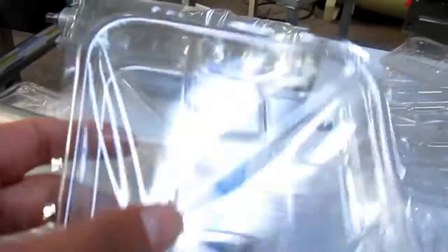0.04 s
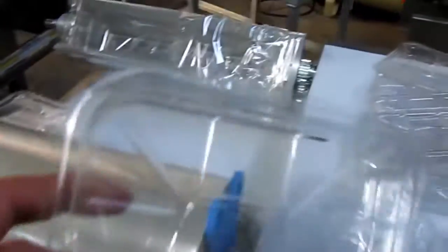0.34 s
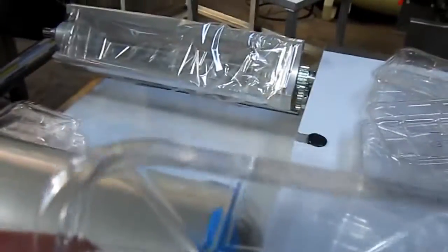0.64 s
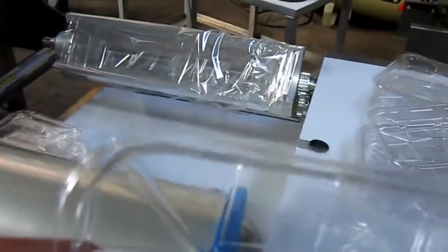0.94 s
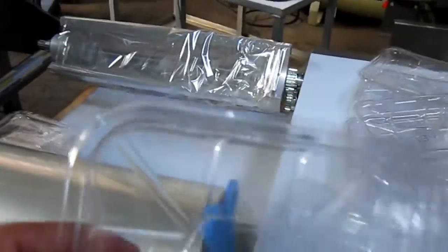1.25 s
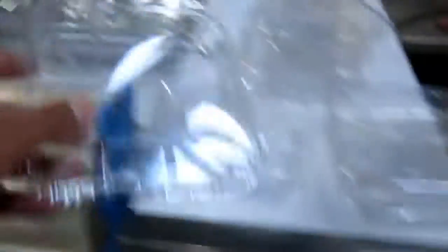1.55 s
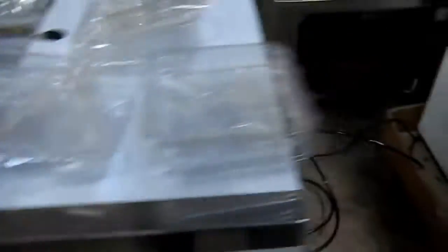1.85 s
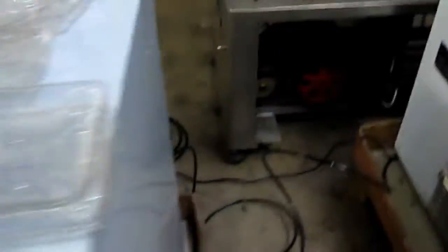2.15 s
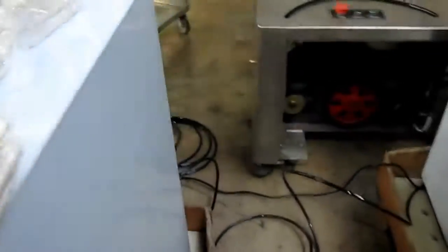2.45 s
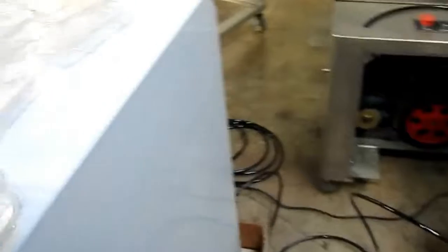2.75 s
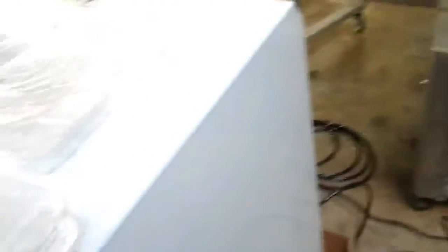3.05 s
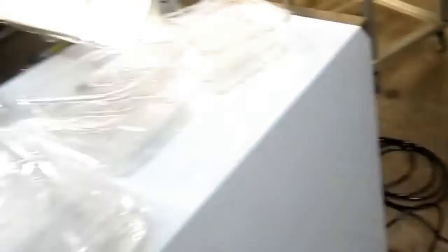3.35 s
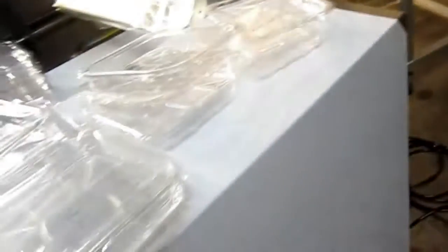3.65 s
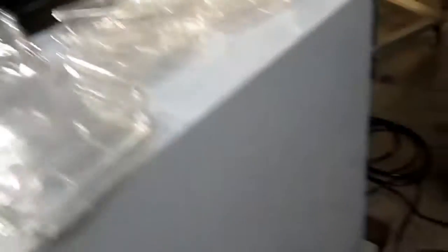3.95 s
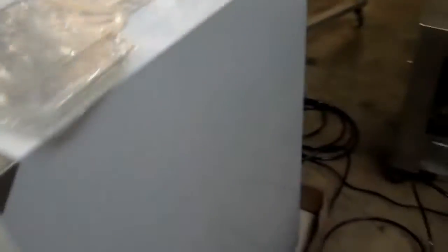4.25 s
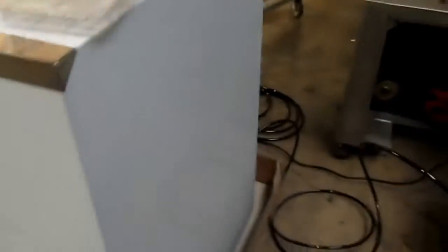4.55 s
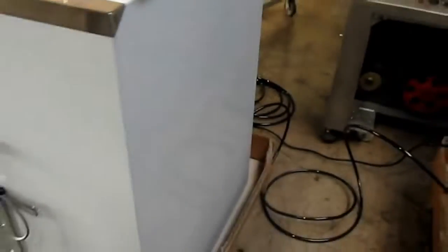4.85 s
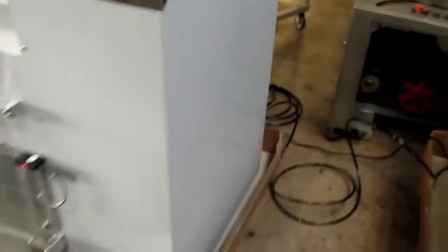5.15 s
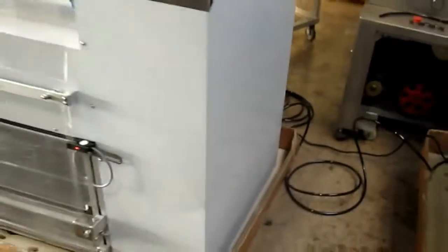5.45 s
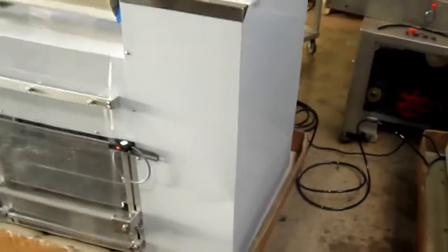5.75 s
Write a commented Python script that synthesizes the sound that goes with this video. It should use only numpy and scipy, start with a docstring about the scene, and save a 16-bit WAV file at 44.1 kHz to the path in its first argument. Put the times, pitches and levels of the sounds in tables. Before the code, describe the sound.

Thin plastic snaps and crinkles lightly over the steady motor hum, low throb and fan noise of an idling workshop machine.

```python
"""A tray sealing machine idles in a workshop while a hand-held microphone is carried along it.
From the start, its motor sings near 338 Hz over a low throb, thin whines and rushing fan air.
The tones swell and fade as the microphone crosses the room's loud and quiet spots (standing waves).
A thin plastic tray crackles, most busily around 2 s; the recorder's gain ducks after sharp snaps.
Near 4.5 s the microphone rounds the cabinet's corner and the tones shift. At the end a soft whine rises."""
import sys
import numpy as np
from scipy import signal
from scipy.fft import rfft, irfft
from scipy.io import wavfile
from scipy.ndimage import uniform_filter1d

SR = 44100
rng = np.random.default_rng(int(sys.argv[2]) if len(sys.argv) > 2 else 0)


def store_pcm(level_fs):
    """Save levels as 16-bit WAV."""
    pcm = np.round(np.clip(level_fs, -1, 1) * 32767).astype(np.int16)
    wavfile.write(sys.argv[1], SR, np.atleast_2d(pcm).T)


N = 264159
TIME = np.arange(N) / SR
FREQ = np.maximum(np.arange(N // 2 + 1) * SR / N, 1)
MOTOR_HZ, RING_HZ, GEAR_HZ, WHISTLE_HZ, TOP_WHISTLE_HZ = 338.07, 1145.0, 1391.6, 4770, 5658


# How loud the motor's main note is along the way: time_s, level_db
MOTOR_LEVELS = [(0, -29.5), (.6, -27), (1.25, -26.5), (1.5, -24.5), (1.78, -22.5), (1.95, -24.5),
                (2.4, -26), (2.8, -33), (3.4, -28.5), (4.2, -28), (4.4, -24.5), (4.85, -21.5), (5.2, -27),
                (5.45, -40.5), (5.8, -27), (5.99, -30)]
# The motor's higher notes: pitch_multiple, before_corner_db, after_corner_db
MOTOR_OVERTONES = [(2, -38, -41), (3, -44.5, -53), (5, -39, -33.5)]

def motor(wobble=.0003, flutter_db=1.0, fade_db=1.15):
    """One spinning shaft makes a note and its overtones, so they all waver slightly together."""
    hz = MOTOR_HZ * (1 + wobble * wander(4))
    out = tone(hz) * undb(curves(MOTOR_LEVELS)[0] + flutter_db * wander(18))
    for multiple, before_db, after_db in MOTOR_OVERTONES:
        level_db = heard_db(multiple * MOTOR_HZ, before_db, after_db)
        out += tone(multiple * hz) * undb(level_db + fade_db * wander(3.95) + flutter_db * wander(18))
    return out


# Tones of the turning shafts and gears: pitch_hz, before_corner_db, after_corner_db
SHAFT_TONES = [(72.0, -44.5, -36.5), (90.4, -38, -35), (253.5, -43, -52.5), (270.5, -42, -39.5),
               (275.6, -34, -45.5), (288.2, -44, -49.5), (310.2, -36.5, -42), (320, -41.5, -47),
               (344.6, -40.5, -40), (440.8, -41.5, -40), (1500, -46.5, -41), (GEAR_HZ, -37, -41),
               (2148, -42, -44)]
# The drive's ring, one leading tone and its close neighbours: pitch_hz, relative_level_db
RING_TONES = [(RING_HZ, -2), (1151, -9.5), (1157, -9.5), (1182, -7), (1186, -10), (1220.5, -10.5)]

def drive(ring_db=-37, ring_wobble=.0005, ring_flutter_db=1.0, ring_fade_db=1.3):
    """Shaft and gear tones beat together into a low throb; close tones ring roughly above them."""
    throb = linked_tones(SHAFT_TONES, wobble=0.000298, flutter_db=0.77, fade_db=0.9)
    ring = np.zeros(N)
    for hz, db in RING_TONES:
        note = tone(hz * (1 + ring_wobble * wander(12)))
        ring += note * undb(db + swell_db(hz) + ring_flutter_db * wander(20))
    return throb + ring * undb(ring_db + ring_fade_db * wander(4))


# Weaker tones of the mains power, gears and bearings: pitch_hz, relative_level_db
WHINE_TONES = [(49.8, -40), (172.3, -44), (241.6, -39), (586.1, -47.5), (760.4, -48.5), (807.5, -41),
               (1310, -45.5), (1559.1, -45), (1730.7, -44.5), (1899.6, -47), (2028.8, -49), (2659.4, -52.5),
               (3955.4, -49.5), (4946.6, -61.5), (5520.6, -56), (5830, -57)]

def whines(wobble=0.0003975, fade_db=2.5, gain_db=-1):
    """Each weak tone fades on its own as the microphone passes its loud and quiet spots."""
    out = np.zeros(N)
    for hz, db in WHINE_TONES:
        note = tone(hz * (1 + wobble * wander(5)))
        out += note * undb(db + gain_db + swell_db(hz) + fade_db * wander(3))
    return out


# Thin, high whistles: pitch_hz, before_corner_db, after_corner_db
WHISTLE_TONES = [(2702.5, -55.5, -44.5), (3168, -52.5, -41.5), (WHISTLE_HZ, -56, -51),
                 (TOP_WHISTLE_HZ, -52, -51)]

def whistles():
    """The motor and its electronics whistle, fluttering in the moving air."""
    return linked_tones(WHISTLE_TONES, wobble=0.000298, flutter_db=1.0, fade_db=1.1)


# Snaps of the plastic tray: start_s, relative_level_db, pitch_hz
TRAY_SNAPS = [(0.1448, -16, 2190), (0.2037, -12, 2800), (.2185, -13.5, 2800), (0.508, -16, 3400),
              (1.8585, -21.5, 2790), (1.8699, -17, 1900), (1.873, -22.5, 4390), (1.876, -15.5, 1800),
              (1.8887, -12, 2800), (1.893, -11.5, 2490), (1.901, -20, 3100), (1.911, -21, 2800),
              (2.016, -20, 3300), (2.0416, -24, 3950), (2.0475, -16.5, 3400), (2.053, -24, 3320),
              (2.0612, -16.5, 2195), (2.185, -20.5, 3000), (2.207, -19, 3010), (2.2113, -19, 3880),
              (2.2152, -16.5, 3510), (2.2815, -21.5, 4920), (2.936, -21, 3800), (3.835, -14, 4010),
              (4.091, -21.5, 3800)]

def tray_snaps(snap_s=0.012, echo_s=0.16, echo_db=-24, crack_s=.004, crack_db=-15, gain_db=-1.0):
    """Thin plastic buckles: each snap is a bright crack and a short burst with a little room echo."""
    out, t = np.zeros(N + SR), np.arange(SR // 8) / SR
    decay = undb(-60 * t / snap_s) + undb(echo_db - 60 * t / echo_s)  # each time is for a 60 dB fade
    crack_band = signal.butter(2, [2000, 6000], "band", fs=SR, output="sos")
    for start_s, db, hz in TRAY_SNAPS:
        burst_band = signal.butter(2, [hz / 1.3, hz * 1.3], "band", fs=SR, output="sos")
        burst = signal.sosfilt(burst_band, rng.standard_normal(len(t)) * decay)
        crack = signal.sosfilt(crack_band, rng.standard_normal(len(t)) * undb(-60 * t / crack_s))
        snap = burst / np.abs(burst).max() + undb(crack_db) * crack / np.abs(crack).max()
        start = int(start_s * SR)
        out[start:start + len(t)] += undb(db + gain_db) * snap
    return out[:N]


# Stretches when the tray rustles: start_s, end_s, level_db, pitch_hz
TRAY_RUSTLES = [(0.418, 0.597, -42, 3800), (1.45, 2.209, -40.5, 2650), (2.559, 2.94, -43.5, 3800),
                (3.5, 4.253, -42, 3800)]

def tray_rustle(width_share=.45, grains_per_s=220, grain_db=3.5):
    """The tray bends between the fingers and slides on the table: a faint, grainy crinkle."""
    out = np.zeros(N)
    for start_s, end_s, db, hz in TRAY_RUSTLES:
        grains = noise(resonance(hz, width_share * hz)) * undb(grain_db * wander(grains_per_s))
        playing = (TIME > start_s) & (TIME < end_s)
        out += grains / grains.std() * uniform_filter1d(undb(db) * playing, SR // 50)  # soft edges
    return out


# The whine at the end: time_s, pitch_hz, level_db
WHINE_RISE = [(5.74, 442, -56), (5.8, 448.3, -39), (5.85, 451, -25), (5.9, 457.6, -30), (5.95, 464, -26.5),
              (5.99, 472, -23)]

def rising_whine():
    """A soft, nearly pure tone swells and climbs a little."""
    hz, db = curves(WHINE_RISE)
    return tone(hz) * undb(db) * (TIME > WHINE_RISE[0][0])


# Sheet-metal panels: pitch_hz, width_hz, level_db
METAL_PANELS = [(851, 180, -36), (1873, 187, -35.5)]

def panels():
    """The pulley's clatter keeps two panels droning; each comes forward for a while."""
    out = np.zeros(N)
    for hz, width_hz, db in METAL_PANELS:
        drone = pulley_clatter(resonance(hz, width_hz))
        out += undb(db + swell_db(hz)) * drone / drone.std()
    return out


def pulley_clatter(colour, turn_hz=11.27, fades_per_s=1.191):
    """A rattle repeats with each turn of a pulley: six loops of noise slowly trade strength."""
    turn_samples = int(SR / turn_hz)
    loops = sum(wander(fades_per_s) * np.resize(rng.standard_normal(turn_samples), N) for _ in range(6))
    even_rattle = loops / np.sqrt(uniform_filter1d(loops ** 2, turn_samples))
    return irfft(rfft(even_rattle) * colour, N) * np.sqrt(SR / 2)


# The fan as the microphone moves nearer and farther: time_s, level_change_db, hiss_change_db
FAN_LEVELS = [(0, -1, -1), (1.2, -0.15, -0.5), (1.6, -1.5, -0.5), (1.83, -3, -1), (2.1, -2, -1),
              (2.7, 0.5, -1.5), (3.5, 0.5, -1.5), (3.9, -1.5, 0.8), (4.6, -1.5, -1), (5.3, 0.2, -3),
              (5.99, 0.5, -2.5)]

def fan(split_hz=2200, gear_teeth_hz=248.8, chop_depth=0.11, flicker_db=.5, clatter_db=-3):
    """Air rushes, chopped lightly as the gear teeth meet, with the pulley's clatter mixed in."""
    level_db, hiss_db = curves(FAN_LEVELS)
    colour = air_colour()
    hiss_share = 1 / (1 + (split_hz / FREQ) ** 6)
    rush = noise(colour * np.sqrt(1 - hiss_share)) * undb(flicker_db * wander(25))
    hiss = noise(colour * np.sqrt(hiss_share)) * undb(hiss_db + flicker_db * wander(25))
    chop = 1 + chop_depth * tone(gear_teeth_hz * (1 + 0.00091 * wander(3)))
    return undb(level_db) * ((rush + hiss) * chop + undb(clatter_db) * pulley_clatter(colour))


# The fan air before the housing shapes it: pitch_hz, level_db_per_hz
AIR_SPECTRUM = [(15, -86.5), (35, -70), (80, -55), (115, -58), (200, -57), (300, -54.5), (500, -57.5),
                (1050, -59), (1600, -60.5), (2250, -66), (3400, -69), (4700, -71.5), (6000, -73.5),
                (7500, -80.5)]
# Pitches that the housing strengthens: pitch_hz, width_hz, boost_db
HOUSING_RESONANCES = [(1230, 200, 2), (1870, 340, 2.5), (2760, 110, 3.5), (3760, 93, 4)]

def air_colour():
    """How strong the fan air is at each pitch after passing through the housing."""
    pitches_hz, levels_db = np.transpose(AIR_SPECTRUM)
    air_db = np.interp(np.log(FREQ), np.log(pitches_hz), levels_db)
    housing_db = sum(db * resonance(hz, width_hz) for hz, width_hz, db in HOUSING_RESONANCES)
    return undb(air_db + housing_db)


# Each tone's loud (+) and quiet (-) spots in the room: middle_s, pitch_hz, length_s, change_db
STANDING_WAVES = [(1.12, 90.2, 0.65, 5), (4.098, 72, 0.97, 9), (4.3, 172, 0.92, 5.5), (1.747, 310, 0.32, 7),
                  (3.4, 310, 0.77, 7.5), (.52, 441, 0.38, 9.5), (1.2, 441, 0.27, 2.5), (5.8, 441, .3, 3.5),
                  (0.697, 676, 1.1, 4.5), (2.2, 676, .12, 4), (2.538, 676, 0.59, 8.5),
                  (4.39, 676, 0.41, 8.5), (3.503, 840, 0.55, 4), (2.749, 1014, 1.1, 9),
                  (4.2, 1014, 0.35, 14), (0.118, RING_HZ, 0.15, 8), (.5, RING_HZ, .3, 4),
                  (1.62, RING_HZ, .26, 8.5), (2.096, RING_HZ, .3, -5), (3.799, RING_HZ, 1.6, -3),
                  (5.47, RING_HZ, .45, 6), (.12, 1184, 0.15, 7.5), (1.32, 1184, .12, 7),
                  (1.62, 1184, .22, 10.5), (3.3, 1184, .5, 2), (4.35, 1184, .5, 4.5), (5.22, 1184, .17, 10),
                  (5.55, 1184, .22, 9), (5.97, 1184, .15, 8), (3.1, GEAR_HZ, .9, -12.5),
                  (4.08, GEAR_HZ, .25, 3), (4.62, GEAR_HZ, .4, -3), (5.3, GEAR_HZ, 0.36, 12.5),
                  (5.61, GEAR_HZ, 0.28, 12), (5.85, GEAR_HZ, .12, -5), (.65, 1690, .3, 4.5),
                  (2.15, 1690, 0.23, -8.5), (2.5, 1690, .4, 6), (2.95, 1690, 0.36, 9), (3.25, 1690, .25, 7),
                  (3.68, 1690, .2, -7), (3.9, 1690, 0.2, 3.5), (4.18, 1690, 0.18, 8),
                  (4.58, 1690, 0.26, -10), (5.132, 1690, .08, -6), (5.4, 1690, .3, 0.5),
                  (5.62, 1690, .1, -9), (5.98, 1690, 0.097, 4), (.88, 1731, .15, 10), (1.19, 1731, .15, 11),
                  (0.797, 1880, .9, 4.5), (.8, 2148, .6, 3.5), (2.25, 2148, 0.27, -8),
                  (4.253, 2148, 0.13, 7), (4.55, 2148, .22, -6), (5.33, 2148, 0.18, 7),
                  (2.63, 2704, .25, 17.5), (2.83, 2704, .16, 12), (3.12, 2704, 0.27, 10),
                  (3.6, 2704, 0.61, 15.5), (4.1, 2704, 0.53, 11), (4.42, 2704, 0.25, 8.5),
                  (4.7, 2704, 0.23, -7), (4.94, 2704, .14, 8), (5.1, 2704, .12, -5), (5.32, 2704, .15, 3),
                  (5.798, 2704, 0.15, 5.5), (1.302, 3168, 1.1, 9), (2.58, 3168, .25, 9), (3, 3168, .2, -9),
                  (3.8, 3168, .3, -10), (4.678, 3168, 0.14, 9), (5.083, 3168, 0.098, 4.5),
                  (5.21, 3168, 0.074, -6), (5.4, 3168, .25, 6), (5.7, 3168, .15, 0), (5.88, 3168, .08, -7),
                  (1.77, WHISTLE_HZ, 0.18, 6), (2.42, WHISTLE_HZ, .4, 9), (2.61, WHISTLE_HZ, .08, -12),
                  (2.899, WHISTLE_HZ, 0.54, 15.5), (3.6, WHISTLE_HZ, .2, -8), (4.5, WHISTLE_HZ, 0.38, 8.5),
                  (0.46, TOP_WHISTLE_HZ, 0.42, 9.5), (0.817, TOP_WHISTLE_HZ, 0.29, 7.5),
                  (1.56, TOP_WHISTLE_HZ, .1, -12), (1.8, TOP_WHISTLE_HZ, 0.27, 8),
                  (2.79, TOP_WHISTLE_HZ, .22, 9), (3.22, TOP_WHISTLE_HZ, .12, -7),
                  (3.42, TOP_WHISTLE_HZ, .12, 9), (3.52, TOP_WHISTLE_HZ, 0.073, -6),
                  (3.85, TOP_WHISTLE_HZ, .4, 5.5), (4.22, TOP_WHISTLE_HZ, 0.13, -3),
                  (4.93, TOP_WHISTLE_HZ, .15, 4), (5.08, TOP_WHISTLE_HZ, .08, -10),
                  (5.27, TOP_WHISTLE_HZ, 0.27, 7.5), (5.55, TOP_WHISTLE_HZ, .12, 4),
                  (5.9, TOP_WHISTLE_HZ, .15, 5)]

def swell_db(hz):
    """A tone smoothly swells or sinks as the microphone crosses the spots listed near its pitch."""
    return sum(change_db * .5 ** ((2 * (TIME - middle_s) / length_s) ** 2)
               for middle_s, pitch_hz, length_s, change_db in STANDING_WAVES
               if abs(pitch_hz - hz) < hz / 60)


def heard_db(hz, before_db, after_db, corner_s=4.45, takes_s=1.0):
    """A tone's level shifts as the microphone rounds the cabinet's corner, and swells on the way."""
    past_corner = np.clip(.5 + (TIME - corner_s) / takes_s, 0, 1)
    return before_db + past_corner * (after_db - before_db) + swell_db(hz)


# The recorder's automatic gain briefly ducks the background after sharp tray snaps: start_s, depth_db
GAIN_DUCKS = [(0, 1.5), (.222, 3), (1.902, 5), (2.055, 4), (2.22, 2), (2.28, 6), (2.94, 3.5)]

def recorder_ducking_db(fall_s=0.013, recovery_db_per_s=25.5):
    """At each listed time the recorder's gain drops fast and climbs back; the deepest duck wins."""
    deepest_db = np.zeros(N)
    for start_s, depth_db in GAIN_DUCKS:
        age_s = TIME - start_s
        fall = np.clip(age_s / fall_s, 0, 1)
        deepest_db = np.maximum(deepest_db, fall * (depth_db - recovery_db_per_s * age_s))
    return -deepest_db


def linked_tones(table, wobble, flutter_db, fade_db):
    """Tones that waver in pitch together, while each fades and flutters on its own."""
    speed = 1 + wobble * wander(4)
    out = np.zeros(N)
    for hz, before_db, after_db in table:
        level_db = heard_db(hz, before_db, after_db)
        out += tone(hz * speed) * undb(level_db + fade_db * wander(3) + flutter_db * wander(10))
    return out


def tone(hz):
    """A pure tone of average power 1 that follows a pitch curve."""
    return np.sqrt(2) * np.sin(2 * np.pi * (np.cumsum(hz) / SR + rng.random()))


def noise(colour):
    """Noise whose strength at each pitch is set by colour (amplitude per root Hz)."""
    return irfft(rfft(rng.standard_normal(N)) * colour, N) * np.sqrt(SR / 2)


def resonance(hz, width_hz):
    """How strongly a ringing part answers each pitch: 1 at hz, less on either side."""
    return 1 / (1 + ((FREQ ** 2 - hz ** 2) / (FREQ * width_hz)) ** 2)


def wander(changes_per_s):
    """A smooth random drift with a typical size of 1."""
    hold = max(int(SR / changes_per_s), 2)
    steps = np.repeat(rng.standard_normal(N // hold + 2), hold)
    drift = uniform_filter1d(uniform_filter1d(steps, hold), hold)[:N]
    return drift / drift.std()


def curves(table):
    """Join the points of a time table with straight lines, one curve for each value column."""
    times_s, *columns = np.transpose(table)
    return [np.interp(TIME, times_s, column) for column in columns]


def undb(db):
    """Turn decibels into a number to multiply by."""
    return 10 ** (np.asarray(db) / 20)


def scene():
    """The machine, the tray and the late whine reach one moving microphone."""
    machine = fan() + panels() + motor() + drive() + whines() + whistles()
    return (machine * undb(recorder_ducking_db()) + tray_snaps() + tray_rustle() + rising_whine())[None]


def record(dry, low_rate_hz=12000, roll_off_hz=6050, top_hz=7500):
    """The microphone's low sample rate mirrors the top whistles upward; the treble fades, then stops."""
    narrow = irfft(rfft(dry) * (FREQ < low_rate_hz / 2), N)
    mirrored = narrow * (1 + 2 * np.cos(2 * np.pi * low_rate_hz * TIME))
    softened = signal.sosfilt(signal.butter(16, roll_off_hz, fs=SR, output="sos"), mirrored)
    return signal.sosfilt(signal.ellip(8, .2, 70, top_hz, fs=SR, output="sos"), softened)


dry = scene()
out = record(dry)
store_pcm(out)
```